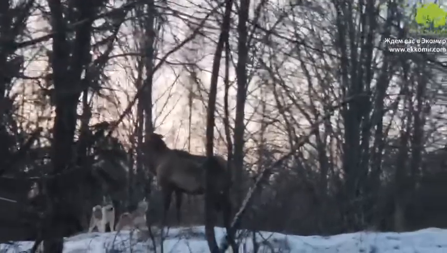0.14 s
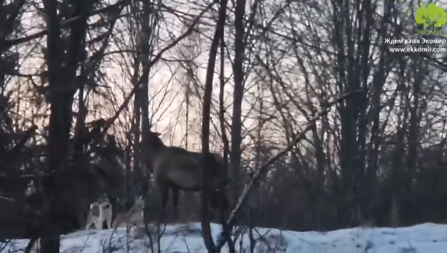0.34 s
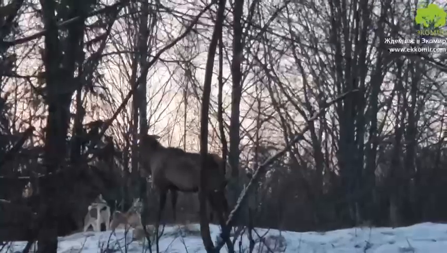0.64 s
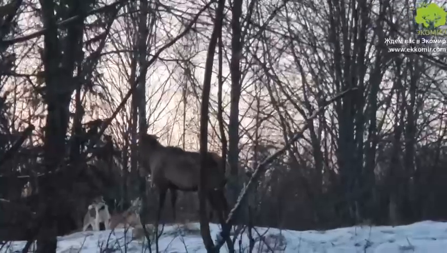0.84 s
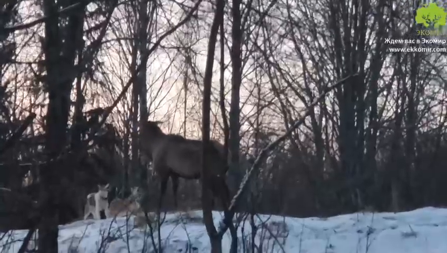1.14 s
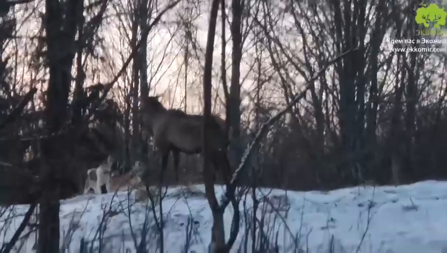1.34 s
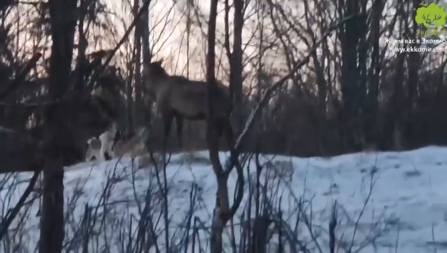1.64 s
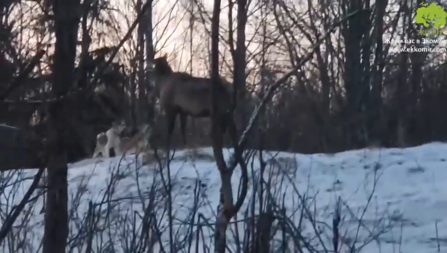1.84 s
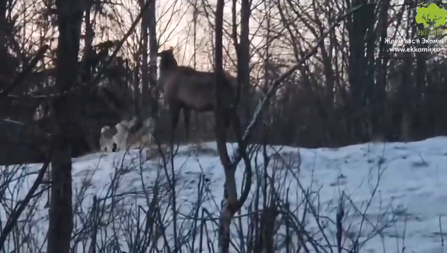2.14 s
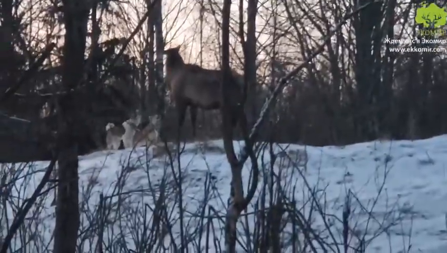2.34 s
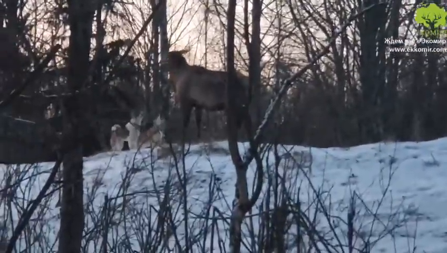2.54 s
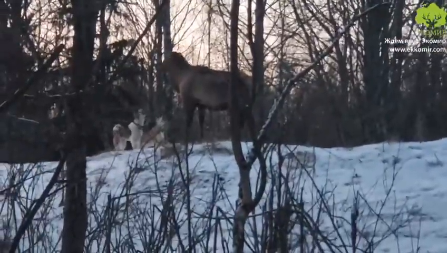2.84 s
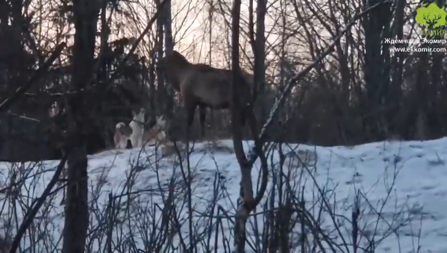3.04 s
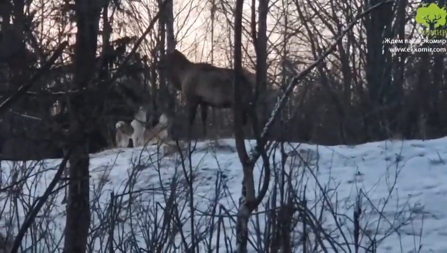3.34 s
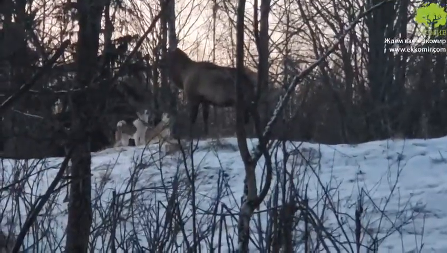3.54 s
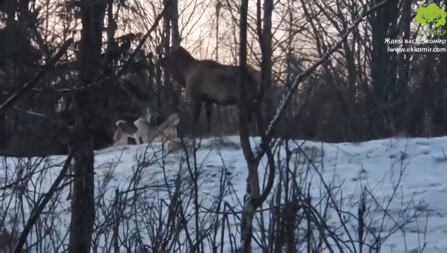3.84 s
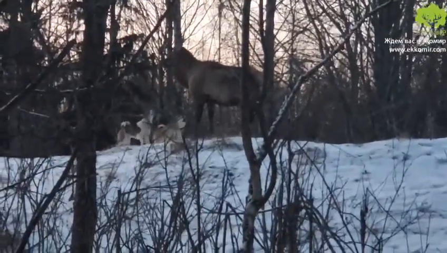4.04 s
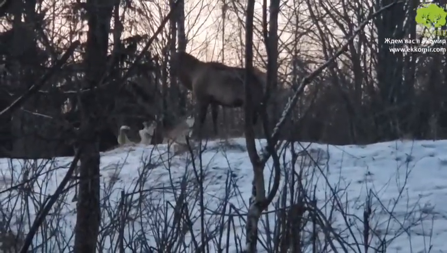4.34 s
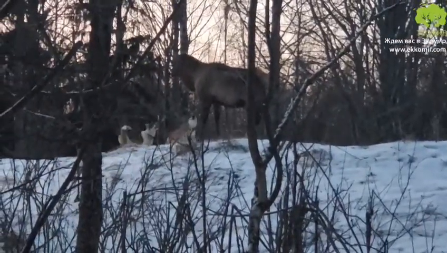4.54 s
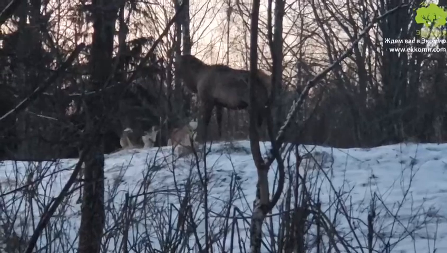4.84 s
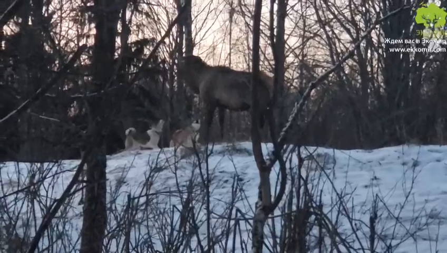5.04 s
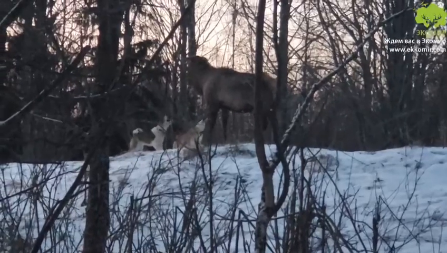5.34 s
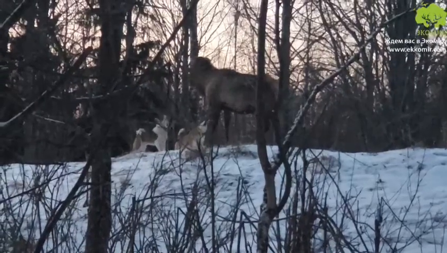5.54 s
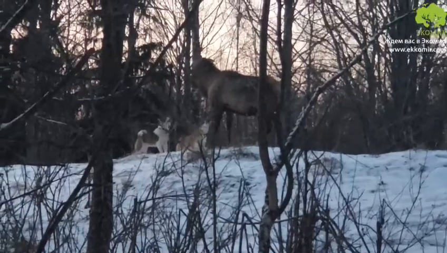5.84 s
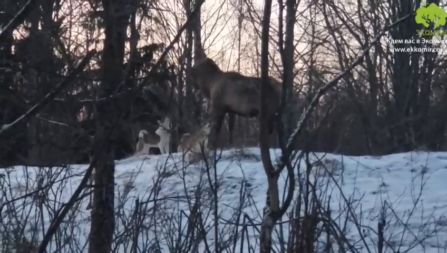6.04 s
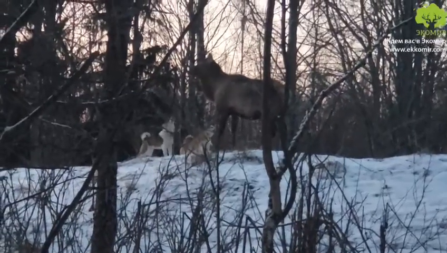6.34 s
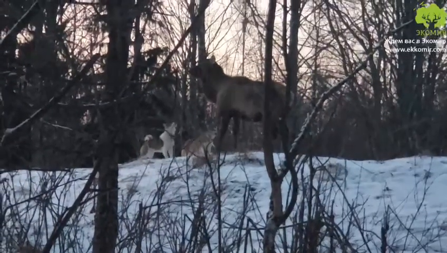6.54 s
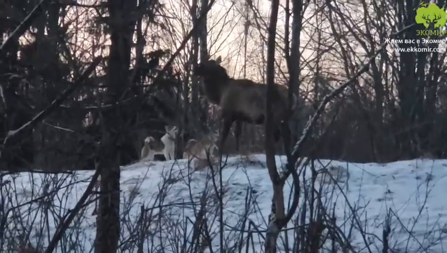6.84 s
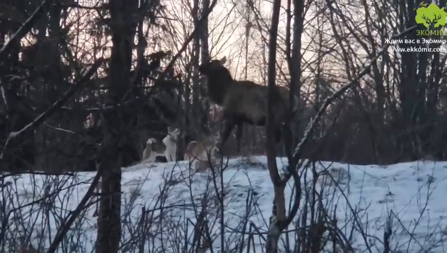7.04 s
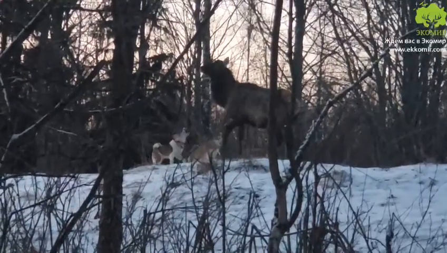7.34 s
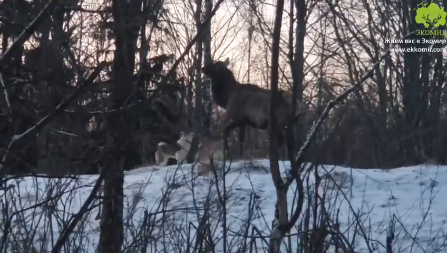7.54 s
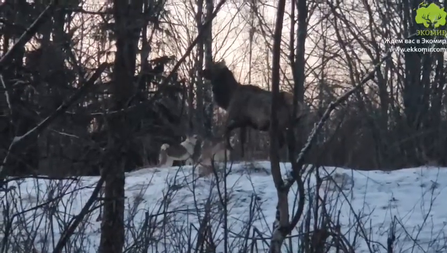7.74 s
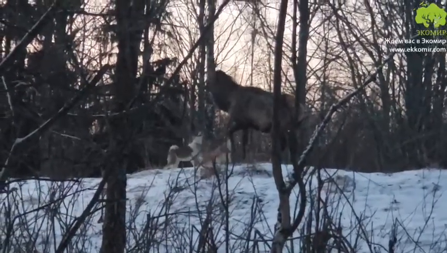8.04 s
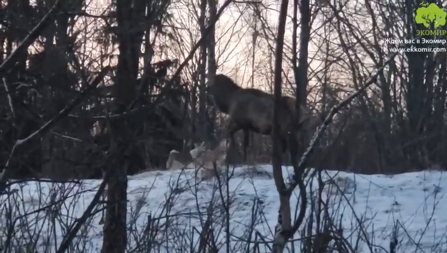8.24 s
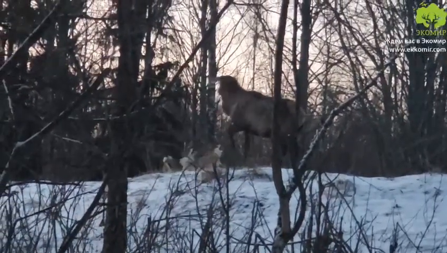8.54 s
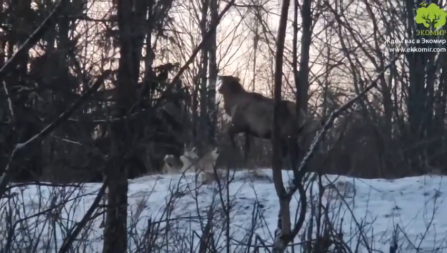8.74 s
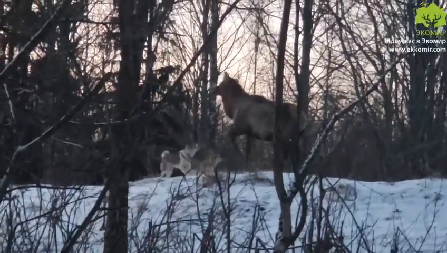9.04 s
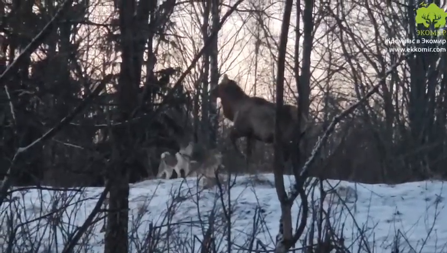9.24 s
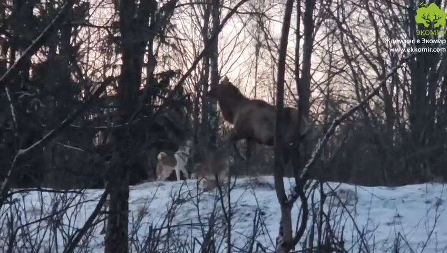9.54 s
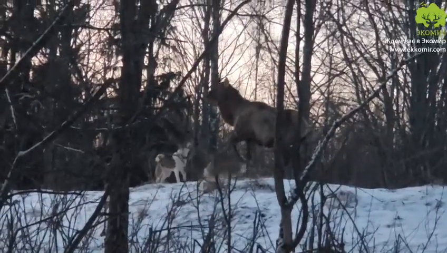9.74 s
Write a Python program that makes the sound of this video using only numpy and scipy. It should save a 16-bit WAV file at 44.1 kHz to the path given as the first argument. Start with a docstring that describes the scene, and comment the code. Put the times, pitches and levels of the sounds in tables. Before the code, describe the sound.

A ten-second stretch of two dogs baying in snowy woods, captured on a hand-held stereo microphone. A hoarse bark sounds at about 0.2 and 0.8 s, then the louder, clear dog starts at 1.1 s, giving short, sharp, mid-high yapping barks every 0.3 to 0.5 s until about 3.9 s. After a gap it resumes from 4.8 to 6.4 s, rests, then barks again from 7.5 to 9.6 s. The second dog is much quieter, rough and breathy, barking about every 0.6 s until 5.9 s, then at 7.7, 8.2, 9.1 and 9.9 s. Every bark rises and falls quickly and leaves a diffuse echo among the trunks, with a lingering low tail. Underneath are a very faint, slowly fading hum, soft dull swells and wisps of thin high whistle. Tiny dry ticks occur near the microphone at roughly 0.1, 2.6, 6.9 and 9 s.

```python
"""Two hunting dogs bay an elk on a snowy rise, heard from a hand-held camera: one clear, one hoarse.
Each bark is a stack of overtones and breath swung over a pitch arch, then shaped by throat and mouth;
dense fading noise echoes stand for the trunks that scatter it. Under it lie a low hum of shaped noise with
faint band-noise swells, a thin high sine whistle and small ticks of snap and thump near the camera."""
import sys
import numpy as np
from scipy import signal
from scipy.fft import rfft, irfft
from scipy.io import wavfile
from scipy.ndimage import uniform_filter1d, minimum_filter1d

SR = 44100
rng = np.random.default_rng(int(sys.argv[2]) if len(sys.argv) > 2 else 0)


def output_pcm(signal):
    """Save a mono or channel-first signal as 16-bit PCM at the path in sys.argv[1].

    Samples are clipped to [-1, 1] before scaling.
    """
    pcm = np.clip(np.atleast_2d(signal).T, -1, 1) * 32767
    wavfile.write(sys.argv[1], SR, np.round(pcm).astype(np.int16))


N = 436590  # length, samples

# Barks of each dog: [t of the arch top/s, top f/Hz, rise/s, fall/s, effort rising/dB, effort at top/dB,
# effort falling/dB, roughness 0-1, treble/dB, gape = factor on all throat resonances, rasp/dB,
# reach = factor on the front resonances]
CLEAR_BARKS = [(1.055, 590, 0.08, 0.065, -10, -0.5, -12, 0.1, -3, 1.054, 1.5, 0.97),
               (1.45, 622.7, 0.077, 0.13, -10, -3, -16, 0.23, -5, 1.05, -4.5, 0.94),
               (1.776, 606, 0.082, 0.06, -11, -4.5, -8.5, 0.31, -5, 1.057, -2, 0.94),
               (2.081, 544, 0.078, 0.068, -18, -9.5, -13, 0.14, 0, 1.044, -6.5, 0.95),
               (2.49, 612.6, 0.083, 0.055, -12.5, -4.5, -9.5, 0.58, -2.5, 1.013, -1, 0.99),
               (2.98, 603.6, 0.084, 0.053, -13.5, -3, -8.5, 0.47, -4, 1.033, -2.5, 0.93),
               (3.472, 610.3, .084, 0.06, -13.5, -5.5, -9.5, 0.2, -4.7, 1.005, -3.5, 1.01),
               (3.922, 583.6, 0.088, 0.081, -15, -7.5, -11, 0.12, -3, 0.98, -6.5, 1.02),
               (4.845, 585, 0.086, 0.058, -17, -8, -8.5, 0.069, 0.5, 1.065, 2.5, 0.94),
               (5.108, 510.6, 0.078, 0.077, -19.5, -7, -19.5, 0.12, -2, 1.031, -5, 0.99),
               (5.546, 627.7, .084, 0.09, -12.5, -3, -19.5, .057, -7.5, 1.03, -4.5, 0.94),
               (6.069, 621, 0.079, 0.065, -13.5, -7.5, -8.5, 0.51, -2.5, 1.015, -2, 0.95),
               (6.42, 584.6, .084, .083, -16.5, -6.5, -10.5, 0.31, -1, 1.023, -1, 0.948),
               (7.533, 626, 0.074, 0.081, -11, -8.5, -13.5, 0.16, -1, 1.007, -2.5, 1),
               (7.999, 642.6, 0.085, 0.056, -12, -4, -6, 0.14, -1, 1.04, -0.5, 0.94),
               (8.531, 618, 0.083, 0.06, -16.5, -7, -11, 0.51, 2.5, 1.084, 4, 0.95),
               (9.015, 635, 0.071, 0.13, -13, -5.5, -32.5, 0.63, 1, 0.99, -1.5, 1),
               (9.296, 615.3, 0.085, 0.073, -15.5, -4.5, -10, 0.32, -2, 1.048, 2.5, 0.94),
               (9.596, 609.4, 0.083, 0.065, -11.5, -4, -11, 0.18, -1, 1.033, 1.5, 0.97)]
HOARSE_BARKS = [(-.3, 575.7, 0.091, 0.12, -4.5, -5, -27.5, 0.82, 1.5, 1.03, 0.39, 0.98),
                (.22, 572.8, 0.085, 0.087, -18.5, -16, -18.5, 0.92, 3.3, 1.002, 0.25, 1.01),
                (.83, 576.4, 0.088, 0.078, -17, -17.5, -15, 1, 1.3, 1.012, 1.6, 1),
                (1.51, 566.3, 0.11, 0.1, -15.5, -21.5, -20, 1, 1.8, 1.004, 1.25, 0.99),
                (2.12, 560, 0.094, 0.088, -13.5, -16, -16, 0.95, 0.86, 0.998, 0.32, 1.03),
                (2.745, 561, 0.09, 0.068, -15, -16.5, -14, 0.99, 1.6, 1.011, 0, 1.04),
                (3.385, 568, 0.083, 0.14, -17, -13.5, -21, 1, 0.82, 1.022, 1.3, 0.95),
                (3.92, 572.2, 0.098, 0.075, -15, -14.5, -15.5, 1, 1.5, 1.03, 0.16, 0.97),
                (4.565, 590.7, 0.09, 0.084, -18, -18, -15.5, 1, 4, 0.99, 0.29, 1.006),
                (5.38, 597.2, 0.089, 0.081, -14, -18, -14, 1, 1.5, 1.046, 0, 0.95),
                (5.9, 586.7, 0.089, .12, -17, -19, -18.5, 1, 0.73, 1.022, 0.96, 0.978),
                (7.65, 555.7, 0.093, 0.084, -15.5, -13, -14.5, 0.67, .1, 1.016, 0.72, 0.96),
                (8.18, 558, 0.086, 0.084, -20, -17.5, -16, 1, .1, 0.98, 0.24, 1.01),
                (9.07, 537, .1, 0.071, -12, -19.5, -22, 0.81, 1.1, 1, 1.1, 0.97),
                (9.93, 545, 0.091, 0.11, -21, -18, -22, 1, 2.6, 1.03, 0.18, 0.94)]
# Response of throat and mouth, a narrow peak among deep valleys: [f/Hz, level/dB]
CLEAR_THROAT = [(300, -42), (500, -50.5), (700, -13.5), (1020, -20), (1190, -1), (1290, 8), (1460, -21),
                (1620, -33.5), (1850, -19), (2150, -40), (2450, -31.5), (2600, -33.5), (2760, -35),
                (2950, -49.5), (3200, -64), (3600, -51), (4100, -39), (4400, -48), (4700, -46.5),
                (5300, -54.5), (6000, -61.5), (7000, -45.5), (7600, -65)]
HOARSE_THROAT = [(300, -36), (450, -38.5), (630, -14), (830, -17), (1030, -8.5), (1250, 6), (1420, -2.6),
                 (1620, -41), (1870, -9.5), (2130, -43.5), (2450, -23), (2600, -27.5), (2800, -26.5),
                 (3050, -41), (3450, -55), (4000, -51), (4500, -63), (5100, -49), (5700, -41.5),
                 (6500, -59), (7300, -49), (7700, -59)]
# Front of the mouth: resonances above UPPER_HZ, and the band of the rasp
UPPER_HZ, RASP_LOW_HZ, RASP_HIGH_HZ = 2000, 1600, 3300
# Half-shut mouth against the open one: factors on all resonances, and further on the front ones
HALF_SHUT, UPPER_HALF_SHUT = .96, .92

# Late echo among the trunks, by band: [f/Hz, t60/s, level/dB]
FOREST_ECHO = [(373, 5.3, -8.5), (719, 2.04, -9.5), (880, 0.25, -23.5), (1300, 0.59, -29.5),
               (1586, 1.27, -19), (1940, 1.65, -15.5), (2600, 0.37, -16.5), (3150, 0.037, -23),
               (4250, 1.3, -21.5), (5800, 0.52, -26), (7040, 0.31, -26)]
# First scatter off trunks and snow: [t60/s, level/dB]
NEAR_TRUNKS = (.035, -9)
ECHO_LENGTH = 3 * SR // 2  # samples
ECHO_CONTRAST = 0.67  # from all sides of the head, the throat's peaks and valleys shrink to this share in dB
CLUMP_DB, CLUMP_PER_S, CLUMP_S = 4, 70, .35  # early echoes come in separate clumps that merge later
PATCHY_DB, PATCH_HZ, PATCH_S = 5.5, 260, .035  # unevenness of the echo, and the size of one patch
# Two microphone ports: [lag of the left/s, most phase lag/rad, middle of the shading toward the right/Hz, swing
# of the shading/dB]
PORTS = (.00014, 2.1, 2600, 6)

# Spectrum of the hum before levelling: [f/Hz, level/dB per Hz]
HUM_SPECTRUM = [(20, -24.5), (33, -17), (56, -5.5), (95, -18), (140, -23.5), (300, -27), (700, -24),
                (1500, -24), (3000, -47), (8000, -45)]
HUM_START_DB, HUM_FADE_DB_PER_S = -59.5, 0.32

# Whistle notes before flicker: [t of the start/s, length/s, level/dB]
WHISTLE_NOTES = [(1.301, 0.095, -58), (2.283, 0.26, -67), (3.262, 0.052, -67), (4.447, 0.15, -64),
                 (4.653, 0.053, -87), (4.734, 0.059, -82), (5.58, 0.26, -76), (6.14, 0.4, -80.5),
                 (6.674, 0.19, -81), (6.832, 0.23, -71), (8.362, 0.13, -61), (8.643, 0.22, -60.5)]
WHISTLE_HZ, WHISTLE_REST_DB = 6848, -97  # the faint steady tone lies under the notes

# Faint low swells before flicker: [t of the start/s, length/s, level/dB, centre f/Hz]
SWELLS = [(0.01, 0.11, -75.5, 181), (0.937, 0.35, -63.5, 184), (1.628, 0.063, -69, 159),
          (1.934, 0.051, -64.5, 166), (3.223, .06, -66, 209), (3.35, 0.24, -61, 190),
          (4.311, 0.23, -66, 144.4), (4.692, 0.12, -64.5, 150), (4.917, 0.08, -64, 153),
          (5.626, 0.23, -68, 195), (7.509, 0.286, -65, 200), (8.347, 0.072, -64, 171),
          (8.534, 0.17, -71, 212), (9.41, 0.2, -65.5, 166), (9.674, 0.089, -60, 202)]
SWELL_EDGE_S, SWELL_WIDTH_HZ, SWELL_FLICKER_DB, SWELL_REST_DB = 0.016, 81, 4.5, -77.5

# Ticks near the camera: [t/s, snap level/dB, thump level/dB, left minus right/dB]
TICKS = [(.13, -49.5, -32, 5.5), (2.591, -42, -30, -0.5), (4.199, -62, -50, 6), (6.861, -49, -46, -12.5),
         (7.22, -65, -56.5, 23), (9.018, -47, -28, 2.5)]

# Camera: top of the scene and of the hiss, hiss level
TOP_HZ, HISS_TOP_HZ, HISS_DB = 7850, 12000, -103.5
# Gain control: threshold, share of the excess (in dB) taken off, window
LIMIT_DB, LIMIT_SHARE, LIMIT_S = -5, .7, .008


def undb(db):
    """Decibels to an amplitude factor."""
    return 10 ** (np.asarray(db) / 20)


def unit(x):
    """Scale to an RMS of 1."""
    return x / np.sqrt(np.mean(x ** 2))


def band(x, hz, width):
    """A resonance applied twice, gain 1 at the centre."""
    b, a = signal.iirpeak(min(hz, .45 * SR), hz / width, fs=SR)
    return signal.lfilter(b, a, signal.lfilter(b, a, x))


def wobble(n, hz, count=None):
    """Smooth noise of RMS 1, changing about hz times a second."""
    k = max(int(SR / hz), 1)
    noise = rng.standard_normal(n if count is None else (count, n))
    return unit(uniform_filter1d(uniform_filter1d(noise, k), k))


def dog(barks, throat, flat, opens, breath_db, tilt, closing, bite, pure_db, depth, breaks, jitter,
        shimmer_db, flutter, flutter_hz, blur):
    """Vocal folds swing up and down a pitch arch; rough folds waver, flutter at a slower rate and leak air."""
    # one second of lead-in lets the echo of an earlier bark hang over the start
    direct, echo = np.zeros(N + 4 * SR), np.zeros((2, N + 4 * SR))
    t = np.arange(-SR // 8, SR // 8) / SR
    n = len(t)
    echo_bands = scatter()
    k = np.arange(1, 17)[:, None]  # overtone numbers
    for (top_s, top_hz, rise, fall, rise_db, top_db, fall_db,
         rough, treble_db, gape, rasp_db, reach) in barks:
        place = np.where(t < 0, t / rise, t / fall)
        arch = np.exp(-abs(place) ** flat)
        # the voice starts clean and breaks up as the push grows
        broken = np.clip(rough, 0, 1) * np.clip((place + breaks) / .3, 0, 1)
        waver = 1 + jitter * broken * wobble(n, 293.4) + 0.01169 * wobble(n, 45)
        hz = top_hz * arch ** depth * waver
        phase = 2 * np.pi * np.cumsum(hz) / SR

        # overtones bite as the push starts and thin out as it ends
        slope = tilt + closing * np.clip(place, 0, 2) + bite * np.clip(place, -1, 0)
        # each strays on its own in size and phase; above the second it does so even in a clean voice
        stray = wobble(n, 200, count=2 * len(k))
        shimmer = shimmer_db * np.maximum(broken, .7 * (k > 2)) * np.tanh(stray[::2])
        size = k ** -slope * undb(shimmer + treble_db * (k > 4))
        # at the top of the arch the voice purifies: the third to fifth overtones sink
        size = size * undb(-pure_db * arch ** 5 * (k > 2) * (k < 6))
        phase_stray = blur * np.tanh((k - 1) / 2) ** 2 * stray[1::2]
        folds = np.sum(size * np.cos(k * phase + phase_stray), axis=0)

        flap_hz = flutter_hz * (1 + 0.273 * wobble(n, 46.7))
        flap = 1 + flutter * broken * np.cos(2 * np.pi * np.cumsum(flap_hz) / SR)
        # bright noise, let through once per cycle of the folds
        air = signal.lfilter([1, -2, 1], 1, rng.standard_normal(n)) * (1 + np.cos(phase)) ** 2 / 2
        breath = air * undb(breath_db + treble_db) * np.sqrt(arch)
        # the mouth opens once the arch passes a share of its top
        mouth = np.clip((arch - opens) / 0.41, 0, 1) ** 2
        effort = undb(np.interp(place, [-.6, 0, .6], [rise_db, top_db, fall_db]))
        voice = (folds + breath) * flap * mouth * effort

        # the resonances rise as the jaw drops
        wide = mouth_shape(throat, rasp_db, reach)
        shut = mouth_shape(throat, rasp_db, reach * UPPER_HALF_SHUT)
        front = colour(voice * arch, wide, gape) + colour(voice * (1 - arch), shut, gape * HALF_SHUT)
        round_about = colour(voice, wide, gape, ECHO_CONTRAST)
        near, far = forest(front, round_about, echo_bands)
        i = int((top_s + 1) * SR) - SR // 8
        direct[i:i + len(near)] += near
        echo[:, i:i + far.shape[1]] += far
    return ports(direct[SR:SR + N]) + echo[:, SR:SR + N]


def mouth_shape(throat, rasp_db, reach):
    """The throat's response for one bark: more or less rasp, front resonances moved."""
    reach = np.clip(reach, .9, 1.1)
    shape = []
    for hz, db in throat:
        moved_hz = hz * (reach if hz > UPPER_HZ else 1)
        shape.append((moved_hz, db + rasp_db * (RASP_LOW_HZ < hz < RASP_HIGH_HZ)))
    return shape


def colour(x, table, shift, contrast=1):
    """Causal filter with the given (Hz, dB) response, by folding the cepstrum of the log gain."""
    hz, db = np.transpose(table)
    f = np.fft.rfftfreq(2048, 1 / SR) + 1
    gain_db = contrast * np.interp(np.log(f), np.log(hz * shift), db)
    cepstrum = irfft(np.log(undb(gain_db)))
    cepstrum[1:1024] *= 2
    return signal.fftconvolve(x, irfft(np.exp(rfft(cepstrum[:1024], 2048))))


def scatter():
    """Decay and noise of each echo band, alike at the two ports in the bass only."""
    f = np.fft.rfftfreq(ECHO_LENGTH, 1 / SR) + 1
    mid, side = rfft(rng.standard_normal((2, ECHO_LENGTH)))
    wide = np.clip((f / 900) ** 1.5, 0, 1) * side
    noise = rfft(patchy(irfft(np.array([mid + wide, mid - wide]))))
    bands = []
    for hz, t60, db in FOREST_ECHO:
        band_noise = irfft(noise * np.exp(-4 * np.log2(f / hz) ** 2))
        bands.append((undb(db) * fade(t60, ECHO_LENGTH), band_noise))
    return bands


def patchy(noise):
    """Every narrow band of the echo swells and sinks on its own, in small patches."""
    f, t, z = signal.stft(noise, SR, nperseg=512)
    field = rng.standard_normal(z.shape[1:])
    for axis, cell in enumerate([PATCH_HZ / f[1], PATCH_S / t[1]]):
        field = uniform_filter1d(field, int(cell), axis=axis)
    uneven = z * undb(PATCHY_DB * unit(field))
    return unit(signal.istft(uneven, SR, nperseg=512)[1][:, :ECHO_LENGTH])


def fade(t60, n):
    """An exponential decay of unit energy."""
    return np.exp(-np.log(1000) * np.arange(n) / SR / t60) * np.sqrt(2 * np.log(1000) / t60 / SR)


def forest(front, round_about, bands):
    """Countless small echoes, shuffled for every bark; each band dies at its own rate, late ones from all round."""
    t60, db = NEAR_TRUNKS
    first = undb(db) * fade(t60, SR // 16) * rng.standard_normal(SR // 16)
    first[0] = 1  # the direct sound
    spot = rng.integers(ECHO_LENGTH)
    late = sum(decay * np.roll(noise, spot, axis=1) for decay, noise in bands)
    t = np.arange(ECHO_LENGTH) / SR
    clumps = undb(CLUMP_DB * wobble(ECHO_LENGTH, CLUMP_PER_S) * np.exp(-t / CLUMP_S))
    late = late * clumps * (1 - np.exp(-t / 0.0017))
    return signal.fftconvolve(front, first), signal.fftconvolve(round_about[None], late, axes=1)


def ports(x):
    """The left port hears later and, shaded by the camera body, duller."""
    lag, most, hz, db = PORTS
    f = np.fft.rfftfreq(N, 1 / SR)
    rise = (f / hz) ** 3
    shade_db = (db * rise / (1 + rise) - .8) / 2
    delay = np.exp(-1j * most * np.tanh(2 * np.pi * f * lag / most))
    return irfft(rfft(x) * np.array([undb(-shade_db) * delay, undb(shade_db)]), N)


def hum():
    """Far noise that slowly fades, much alike at both ports in the bass."""
    f = np.fft.rfftfreq(N, 1 / SR) + 1
    hz, db = np.transpose(HUM_SPECTRUM)
    mid, side = rfft(rng.standard_normal((2, N))) * undb(np.interp(np.log(f), np.log(hz), db))
    wide = np.clip(.24 + (f / 1000) ** 2, 0, 1) * side
    left = undb(1.8) * (mid + wide)
    steady = unit(irfft(np.array([left, mid - wide]), N))
    return steady * undb(HUM_START_DB - HUM_FADE_DB_PER_S * np.arange(N) / SR + 0.45 * wobble(N, 7.5))


def whistle():
    """A thin, slightly wavering sine that comes in short fading notes over a faint steady tone."""
    t = np.arange(N) / SR
    size = np.full(N, undb(WHISTLE_REST_DB))
    for s, length, db in WHISTLE_NOTES:
        size = size + undb(db) * np.clip(np.minimum((t - s) / 0.0083, (s + length - t) / length), 0, 1)
    hz = WHISTLE_HZ * (1 + 0.0006 * wobble(N, 40))
    tone = np.sqrt(2) * np.sin(2 * np.pi * np.cumsum(hz) / SR)
    right_louder_db = np.array([[0], [1.]])
    return tone * size * undb(4.9 * wobble(N, 25) + right_louder_db)


def swells():
    """Short dull swells of band noise with soft edges and an uneven top, over a weak bed of wavering level."""
    t, noise = np.arange(N) / SR, rng.standard_normal(N)
    out = unit(band(noise, 89, 270)) * undb(SWELL_REST_DB + 1.4 * wobble(N, 2.8))
    flicker = undb(SWELL_FLICKER_DB * wobble(N, 11))
    for s, length, db, hz in SWELLS:
        # the soft edges lie outside start and end
        shape = np.clip(np.minimum(t - s, s + length - t) / SWELL_EDGE_S + 1, 0, 1) ** 2
        out = out + undb(db) * shape * flicker * unit(band(noise, hz, SWELL_WIDTH_HZ))
    return out


def ticks():
    """A short dry snap of fading noise with a dull, heavily damped sine thump under it."""
    out, t = np.zeros((2, N)), np.arange(SR // 20) / SR
    for s, db, thump_db, pan_db in TICKS:
        snap = undb(db) * np.exp(-t / .0025) * unit(band(rng.standard_normal(len(t)), 1900, 2800))
        thump = undb(thump_db) * np.exp(-t / 0.00056) * np.sin(2 * np.pi * 220 * t)
        i = int(s * SR)
        out[:, i:i + len(t)] += (snap + thump) * undb([[pan_db / 2], [-pan_db / 2]])
    return out


def scene():
    """Both dogs over the hum, with whistle, swells and ticks."""
    clear = dog(CLEAR_BARKS, CLEAR_THROAT, flat=2.2, opens=0.22, breath_db=6.5, tilt=0.09, closing=0.98,
                bite=0.1, pure_db=1, depth=1, breaks=.72, jitter=.045, shimmer_db=5,
                flutter=.2, flutter_hz=190, blur=1.2)
    hoarse = dog(HOARSE_BARKS, HOARSE_THROAT, flat=2.2, opens=0.26, breath_db=7, tilt=0.25, closing=0.5,
                 bite=0.054, pure_db=0.0, depth=.55, breaks=1, jitter=.05, shimmer_db=4,
                 flutter=.85, flutter_hz=125, blur=.65)
    return clear + hoarse + hum() + swells() + whistle() + ticks()


def record(dry):
    """The camera turns down what is loudest and cuts the top steeply; a very faint hiss of its own lies above."""
    hiss = undb(HISS_DB + 3.6 * wobble(N, 6)) * unit(band(rng.standard_normal((2, N)), 10600, 2600))
    span = int(LIMIT_S * SR)
    gain = np.maximum(abs(dry).max(axis=0) / undb(LIMIT_DB), 1) ** -LIMIT_SHARE
    gain = uniform_filter1d(minimum_filter1d(gain, span), span)
    scene_cut = signal.ellip(8, .2, 60, TOP_HZ, fs=SR, output="sos")
    hiss_cut = signal.ellip(8, .2, 60, HISS_TOP_HZ, fs=SR, output="sos")
    return signal.sosfilt(hiss_cut, signal.sosfilt(scene_cut, dry * gain) + hiss)


dry = scene()
out = record(dry)
output_pcm(out)
```